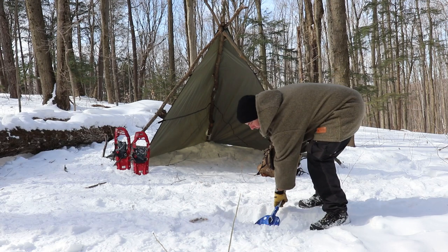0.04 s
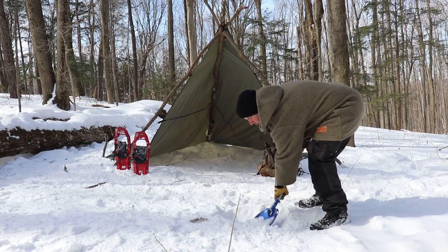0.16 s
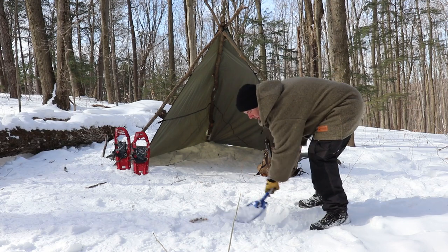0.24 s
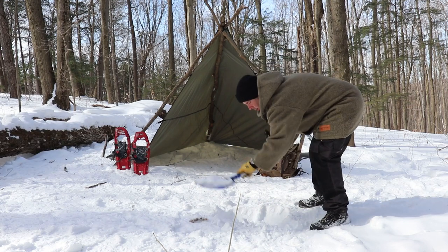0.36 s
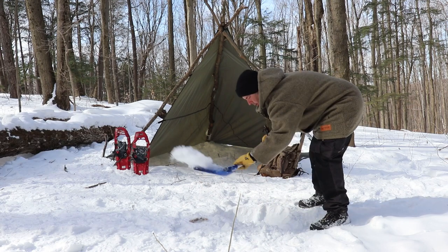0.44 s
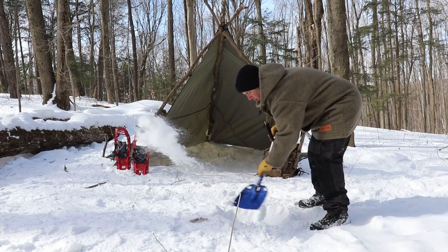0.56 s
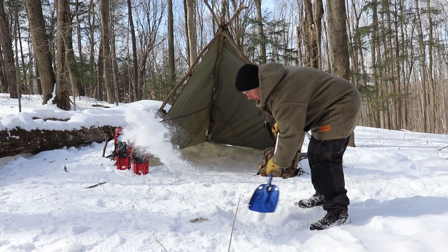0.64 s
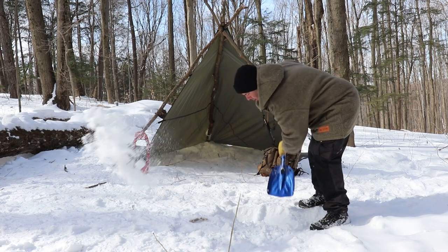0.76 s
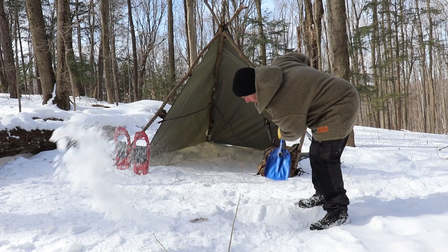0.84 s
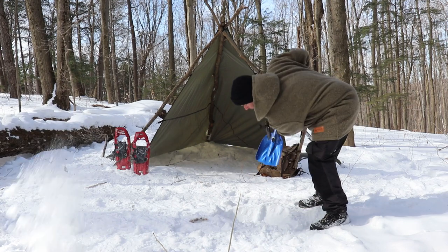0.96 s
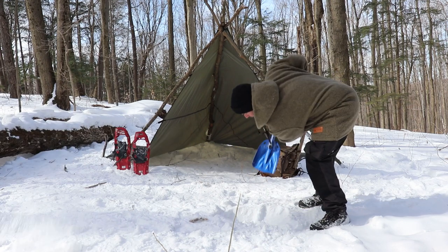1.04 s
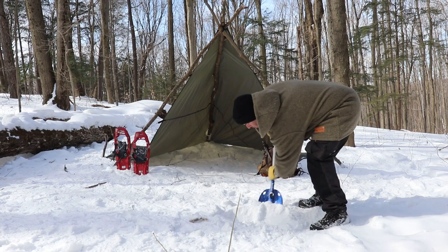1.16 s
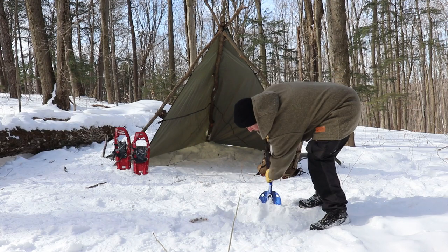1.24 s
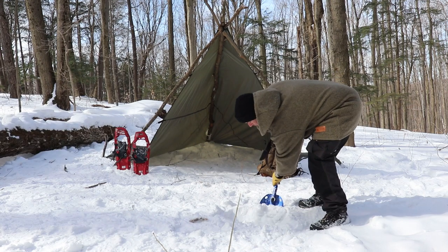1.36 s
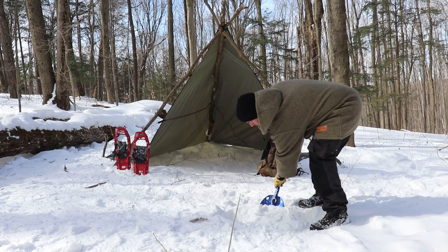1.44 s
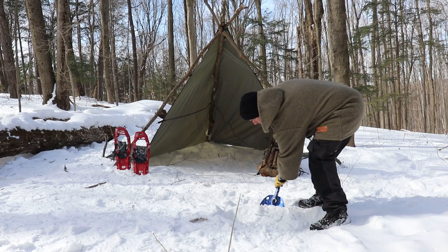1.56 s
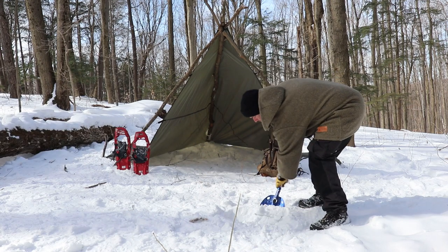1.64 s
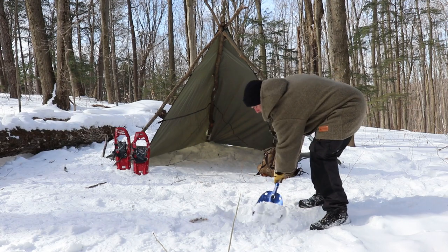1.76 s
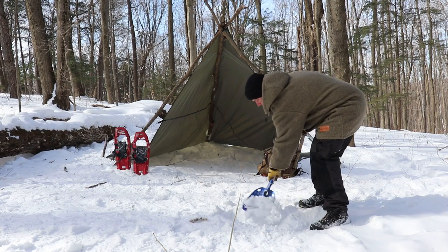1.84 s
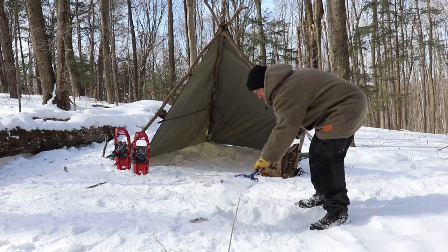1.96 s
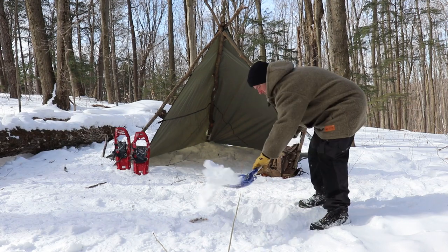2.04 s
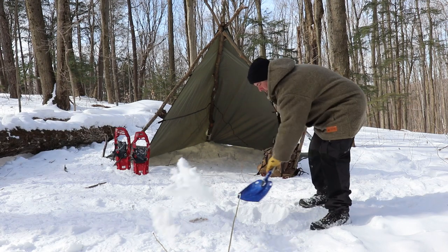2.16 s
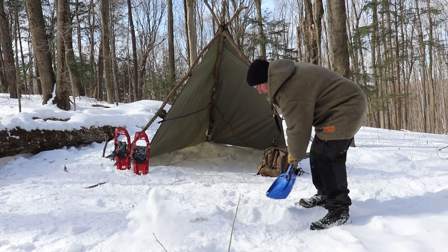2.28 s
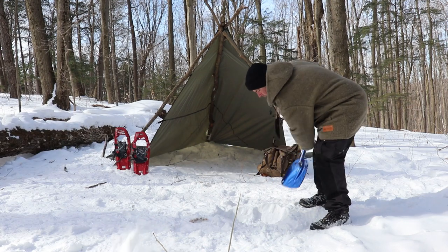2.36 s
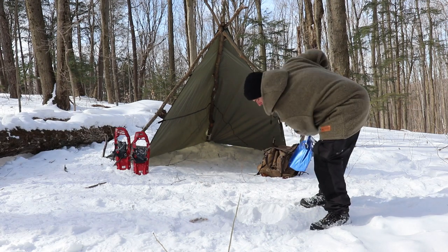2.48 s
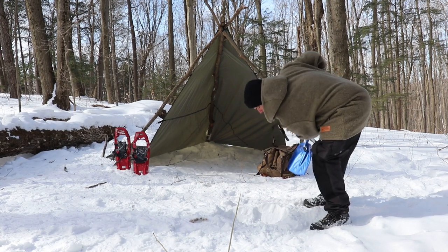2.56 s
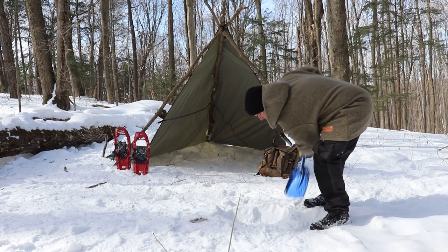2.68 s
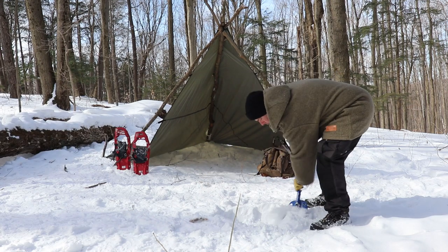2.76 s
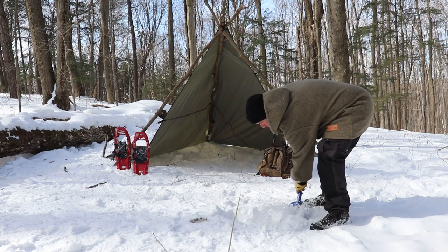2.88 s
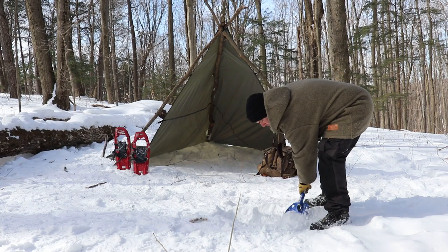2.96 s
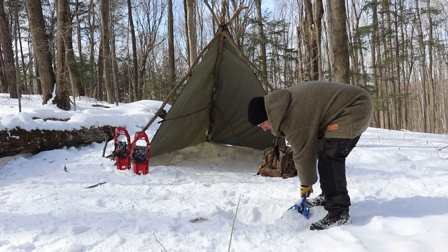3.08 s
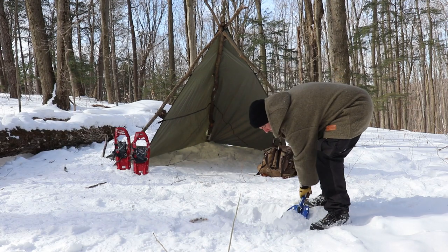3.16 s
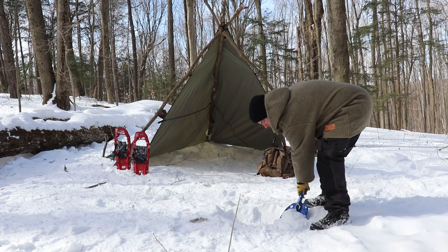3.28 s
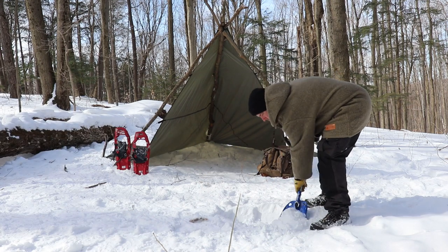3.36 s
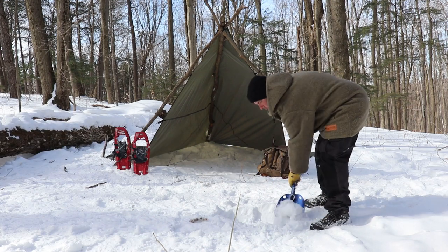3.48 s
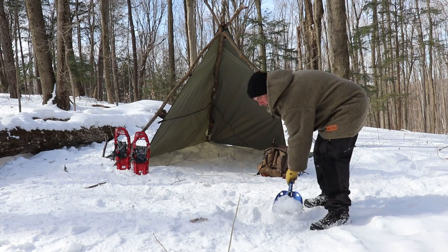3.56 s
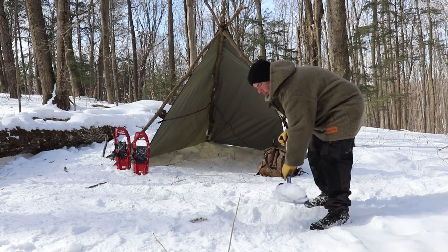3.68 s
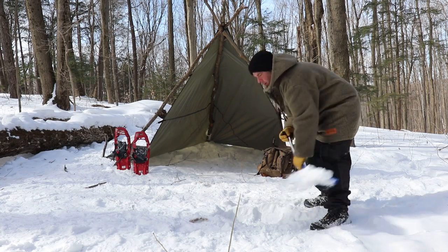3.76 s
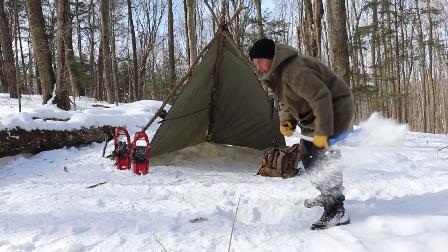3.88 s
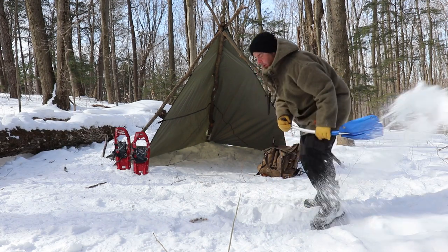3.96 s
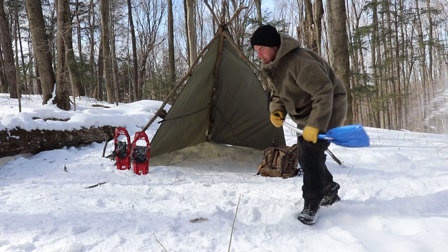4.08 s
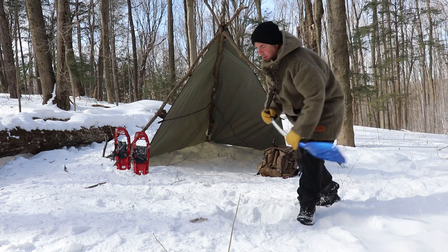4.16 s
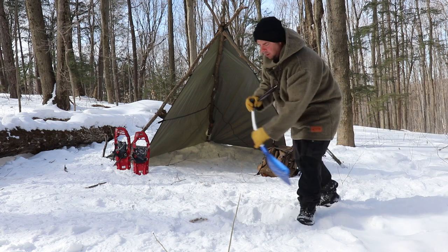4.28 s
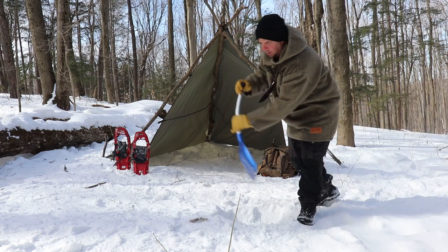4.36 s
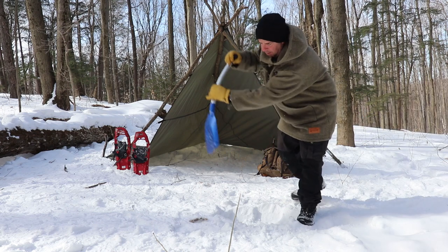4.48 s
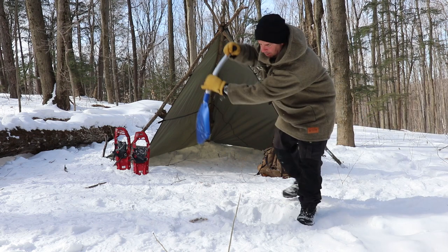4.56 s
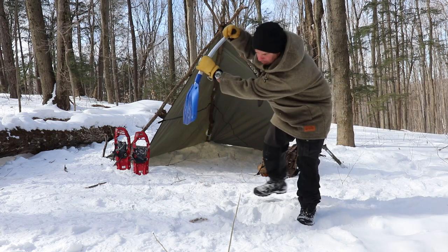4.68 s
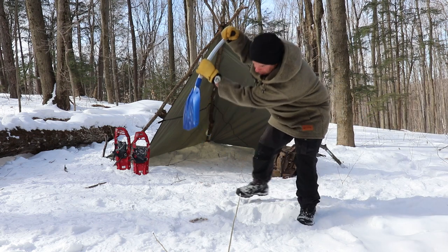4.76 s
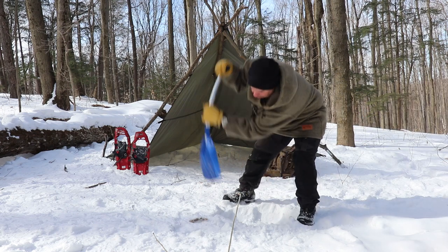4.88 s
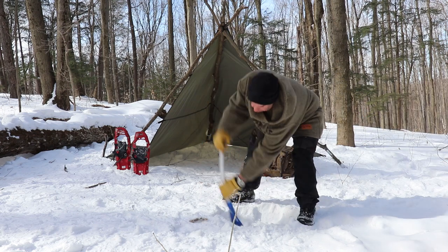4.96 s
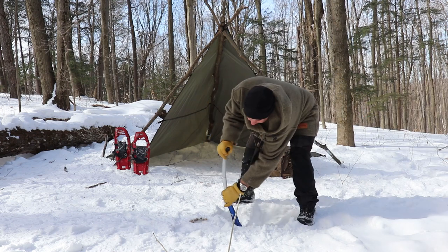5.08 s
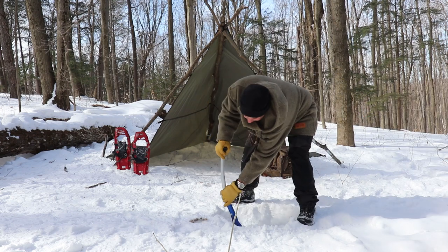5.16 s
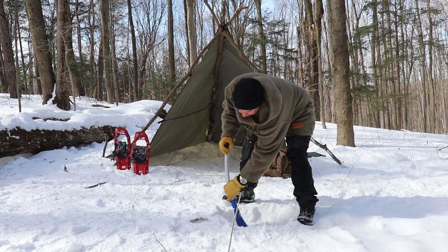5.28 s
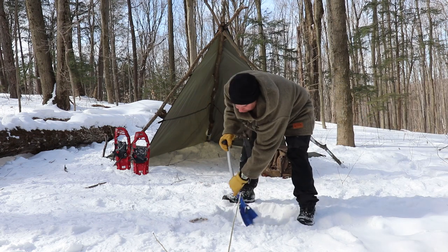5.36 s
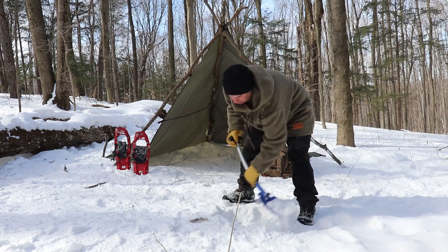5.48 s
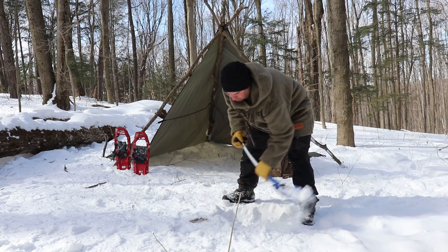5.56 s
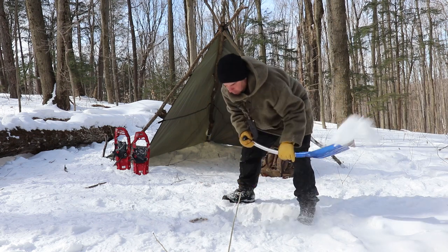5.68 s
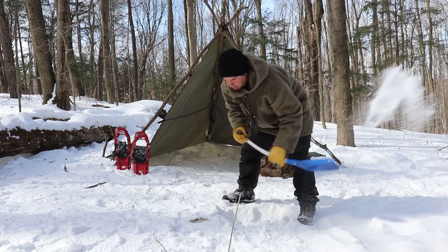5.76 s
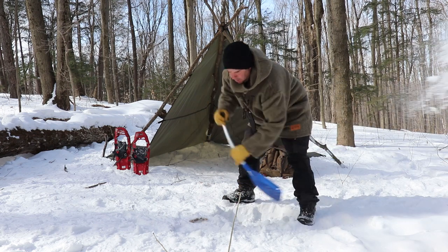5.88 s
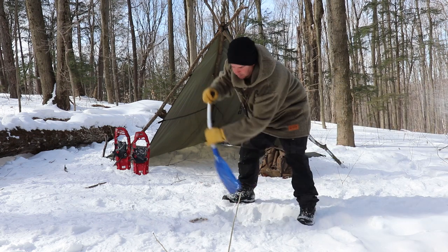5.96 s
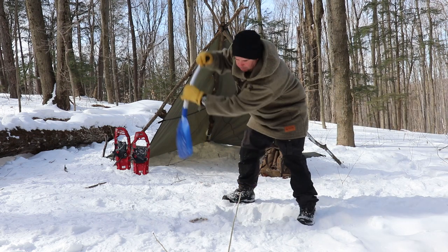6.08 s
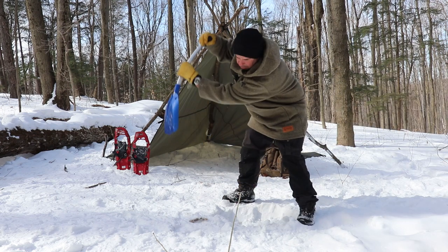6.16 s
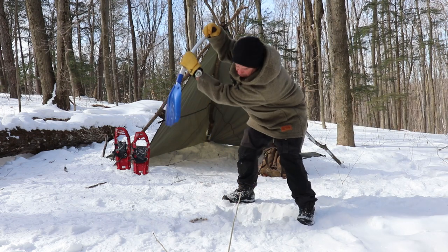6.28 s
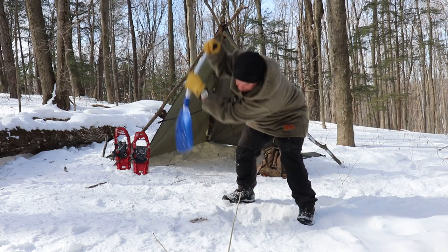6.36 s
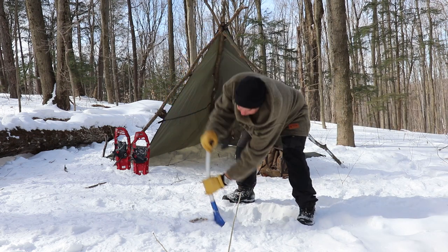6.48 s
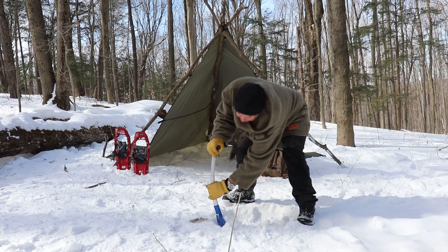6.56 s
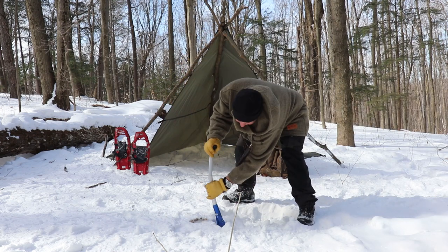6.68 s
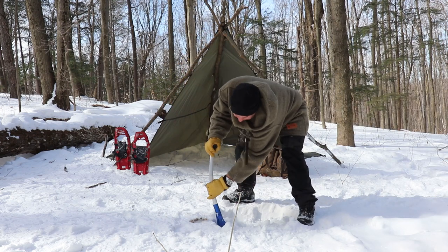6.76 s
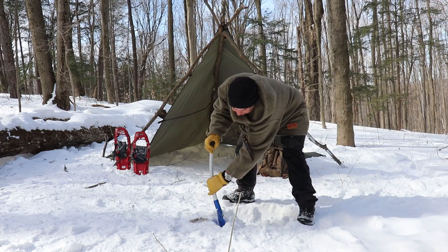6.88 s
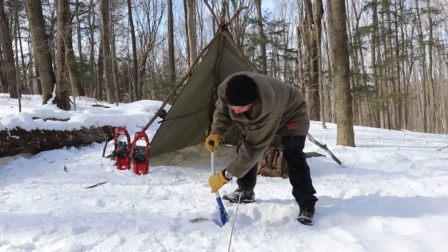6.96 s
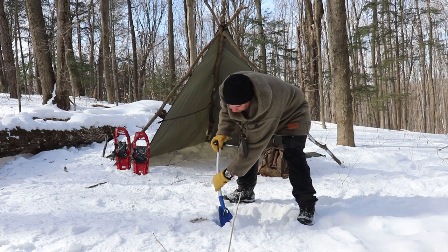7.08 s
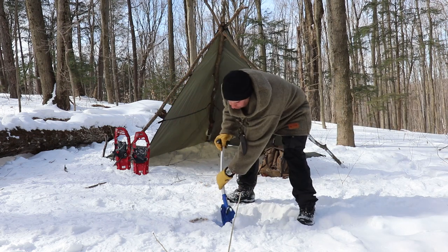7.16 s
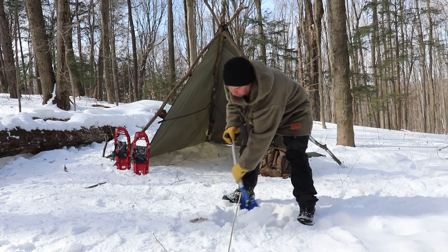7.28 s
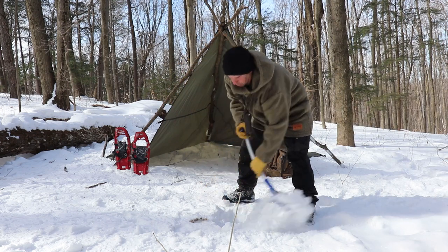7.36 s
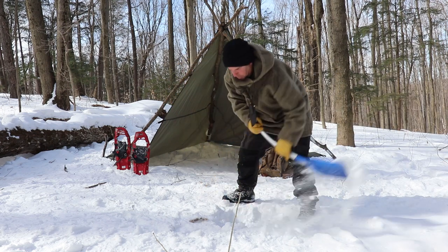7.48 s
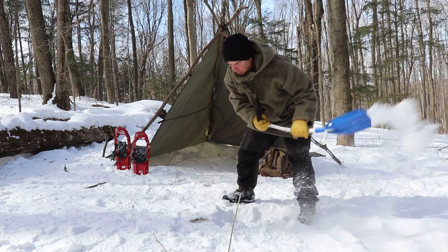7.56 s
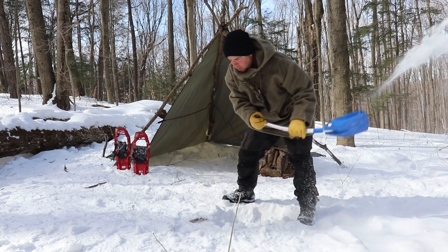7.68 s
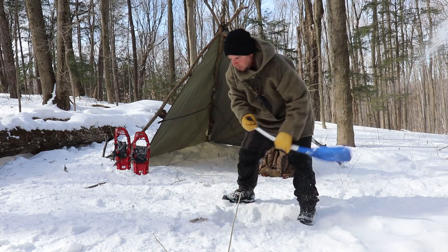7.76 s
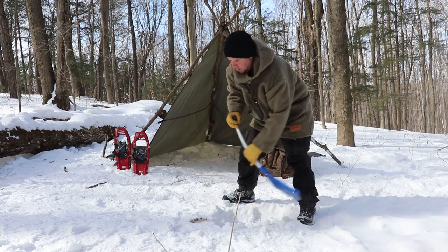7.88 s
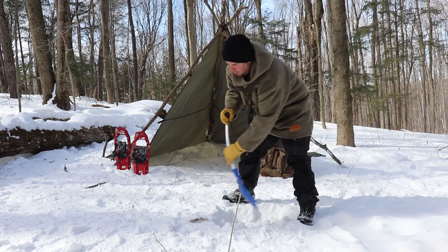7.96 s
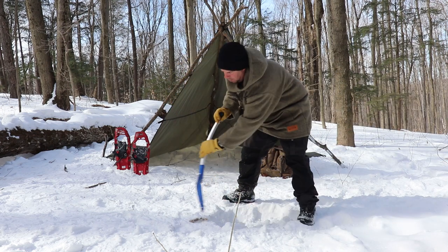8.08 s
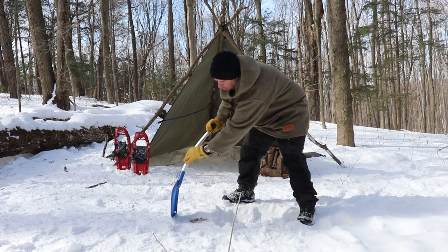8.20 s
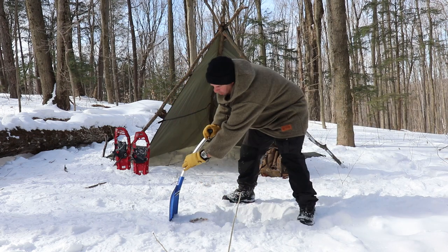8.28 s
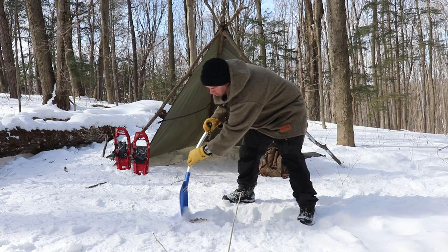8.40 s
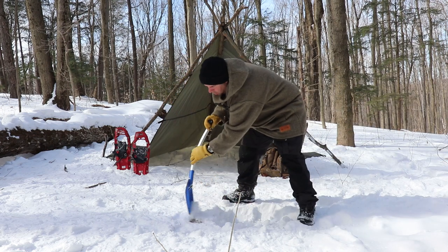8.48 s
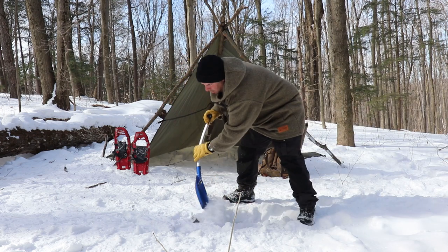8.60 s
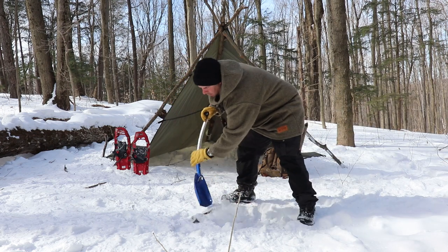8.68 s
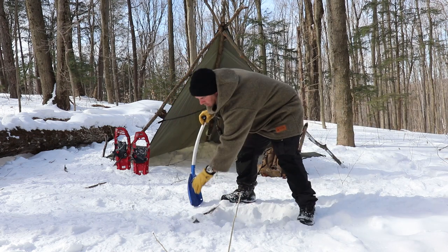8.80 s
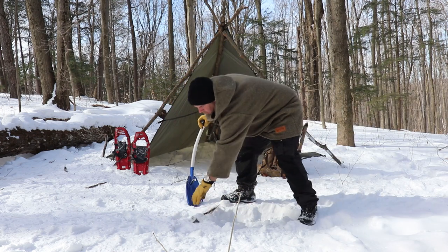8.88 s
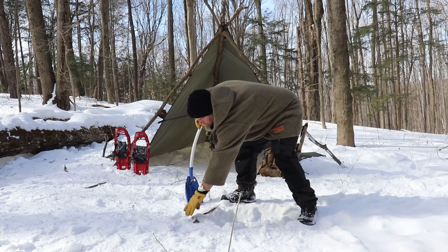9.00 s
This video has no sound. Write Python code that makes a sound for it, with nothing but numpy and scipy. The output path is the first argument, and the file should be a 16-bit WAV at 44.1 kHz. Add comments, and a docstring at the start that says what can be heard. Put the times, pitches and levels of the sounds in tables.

```python
"""A short metal shovel cuts packed snow in a still winter wood, a few metres away.
Four hard chops crush the crust; between them the blade is pushed and levered, slabs snap loose,
snow slides off the ringing blade, boots tread, a jacket rubs and a zip pull ticks.
Random bursts of snapping bonds are coloured as snow or cloth and shaped by strokes; blade, pack and
zip ring as decaying sines. Slabs crack as noise bursts; a faint tail and filtered hush surround it all."""
import sys
import numpy as np
from scipy import signal
from scipy.fft import rfft, irfft
from scipy.io import wavfile
from scipy.ndimage import uniform_filter1d, map_coordinates

SR = 44100
rng = np.random.default_rng(int(sys.argv[2]) if len(sys.argv) > 2 else 0)


def wrap_up_sound(samples):
    """Save the sound to the file named by the first command line argument, as 16-bit audio."""
    columns = np.atleast_2d(samples).T
    # keep every value between -1 and 1, then stretch to whole-number steps
    tamed = np.clip(columns, -1, 1)
    steps = np.round(tamed * 32767).astype(np.int16)
    wavfile.write(sys.argv[1], SR, steps)


N = 398223
TIME = np.arange(N) / SR  # seconds
DEEP_HZ, THUD_HZ, FIZZ_HZ = 330, 1400, 6000  # borders between deep thud, upper thud, crunch and fizz

# Modes of the free, unloaded blade. Each row: pitch in Hz, relative level in dB, t60 in seconds.
FREE_BLADE = [(567, -10, .26), (769, -6, .18), (900, -6, .12), (1100, -8, .2), (1234, -3, .22),
              (1367, -7, .17), (1524, 0, .2), (1626, -8, .22), (1812, -6, .11), (1985, -5, .12),
              (2245, 0, .27), (2385, -4, .18), (2474, -7, .24), (2712, -6, .13), (2925, -1, .11),
              (3146, -4, .1), (3290, -2, .09), (3612, -2, .13), (3740, -7, .09), (4120, -7, .09),
              (4555, -6, .12), (4895, -8, .13), (5350, -10, .09)]
# Modes of the blade gripped by snow. Each row: pitch in Hz, relative level in dB, t60 in seconds.
BURIED_BLADE = [(532, 6, 0.058), (810, -5.5, 0.017), (1400, -7.5, 0.044), (2396, -0.5, 0.024),
                (2620, -11, 0.011), (2990, -9, 0.057), (3270, -6.5, 0.06), (4740, -9.5, 0.13),
                (4810, -9.5, 0.054)]
# Colour of packed snow breaking. Each row: frequency in Hz, relative level in dB.
PACKED_SNOW = [(25, -43.5), (50, -29), (95, -8), (250, 0.5), (480, -1), (780, 2.5), (1300, 1), (1700, -4.5),
               (3200, -1.5), (4000, -9), (5100, -10), (6400, -19.5), (10500, -17), (13500, -20),
               (16000, -28)]
# Colour of loose snow. Each row: frequency in Hz, relative level in dB.
LOOSE_SNOW = [(60, -17.5), (280, -12), (550, -1.5), (1200, 0), (3200, 0.5), (5000, -8), (6500, -18),
              (12000, -19.5), (16000, -30)]


def undb(db):
    """Decibels to gain."""
    return 10 ** (np.asarray(db) / 20)


def unit(x):
    """Scale to rms 1."""
    return x / np.sqrt(np.mean(x ** 2))


def to_peak(x, db):
    """Scale to a peak level in dB."""
    return undb(db) * x / np.abs(x).max()


def add(out, start, x):
    """Mix a sound in at a time in seconds."""
    i = max(int(start * SR), 0)
    out[i:i + len(x)] += x[:max(N - i, 0)]


def through(x, response):
    """Pass a sound through an impulse response."""
    return signal.oaconvolve(x, response)[:len(x)]


def response_of(spectrum):
    """Minimum-phase impulse response with the given (Hz, dB) colour, by folding its cepstrum."""
    size = 2048
    hz, db = np.transpose(spectrum)
    bins = np.maximum(np.arange(size // 2 + 1) * SR / size, 1)
    level_db = np.interp(np.log(bins), np.log(hz), db)
    cepstrum = irfft(np.log(undb(level_db)))
    cepstrum[1:size // 2] *= 2
    cepstrum[size // 2 + 1:] = 0
    return irfft(np.exp(rfft(cepstrum)))


def fade(t, t60):
    """Exponential decay, falling 60 dB in t60 seconds."""
    return np.exp(-np.log(1000) * t / max(t60, 1e-4))


def walk(rate):
    """Smooth random wander at rms 1, with about `rate` fresh levels a second."""
    k = max(int(SR / rate), 1)
    held = np.repeat(rng.standard_normal(N // k + 1), k)
    return unit(uniform_filter1d(held, k)[:N])


def ring(modes):
    """Half a second of decaying sines at random phases, from (Hz, dB, t60) modes."""
    t = TIME[:SR // 2]
    return sum(undb(db) * fade(t, t60) * np.sin(2 * np.pi * (hz * t + rng.random())) for hz, db, t60 in modes)


def registers(x):
    """Split into thud, crunch and fizz at rms 1; the thud comes in a deep and an upper part."""
    cuts = [(DEEP_HZ, "low"), ([DEEP_HZ, THUD_HZ], "band"), ([THUD_HZ, FIZZ_HZ], "band"), (FIZZ_HZ, "high")]
    filters = [signal.butter(3, hz, kind, fs=SR, output="sos") for hz, kind in cuts]
    deep, upper, crunch, fizz = (signal.sosfiltfilt(sos, x) for sos in filters)
    thud_rms = np.std(deep + upper)
    return deep / thud_rms, upper / thud_rms, unit(crunch), unit(fizz)


def bite(parts, thud_db, fizz_db, depth=0.18):
    """Weigh the registers; the bigger the slab that moves, the deeper its thud reaches."""
    deep, upper, crunch, fizz = parts
    deep_gain = undb(depth * np.clip(thud_db, -12, 4))
    return undb(thud_db) * (upper + deep_gain * deep) + crunch + undb(fizz_db) * fizz


def fractures(rate, spread_db, burst_t60, bond_db):
    """Snow fails in little avalanches: each break of the crust sets off a brief burst of snapping ice bonds."""
    sizes = undb(spread_db * np.minimum(rng.exponential(size=N), 4))
    breaks = (rng.random(N) < rate / SR) * sizes  # `rate` breaks a second on average
    activity = np.abs(through(breaks ** 2, fade(TIME[:SR // 20], burst_t60) ** 2))
    bonds = rng.standard_normal(N) * undb(bond_db * np.minimum(rng.exponential(size=N), 4))
    x = np.sqrt(activity) * bonds
    # the work done over 25 ms is set by the push, however it is shared among the breaks
    return x / np.sqrt(np.abs(uniform_filter1d(x ** 2, size=1100)) + 1e-9)


def patchy(x, depth_db, patches):
    """Every piece that breaks off has its own size, so the colour jumps about from moment to moment."""
    size = 512
    hz, _, spectrum = signal.stft(x, SR, nperseg=size)
    place = np.log1p(hz / 700) / np.log1p(hz[-1] / 700) * patches
    moment = np.arange(spectrum.shape[1]) / 3.5
    # random levels on a grid of moments and pitches, joined smoothly
    field = rng.standard_normal((int(patches) + 2, int(moment[-1]) + 2))
    grid = np.meshgrid(place, moment, indexing="ij")
    db = depth_db * map_coordinates(field, grid, order=1)
    return signal.istft(spectrum * undb(db), SR, nperseg=size)[1][:N]


def on_blade(x, spectrum, modes, ring_db, drift):
    """Breaking snow is heard directly and through the metal, whose modes wander as the load on it shifts."""
    x = patchy(x, depth_db=3.2, patches=30)
    # the metal rings on a clock that runs a little fast or slow, which shifts all its pitches together
    clock = np.arange(N)
    warp = clock + np.cumsum(drift * unit(np.gradient(walk(16))))
    struck = np.interp(clock, np.maximum.accumulate(warp), x)
    metal = np.interp(warp, clock, through(struck, ring(modes)))
    direct = unit(through(x, response_of(spectrum)))
    return direct + undb(ring_db) * unit(metal)


def play(x, strokes, attack_s, release_s, deepen_db=0, judder_db=0, settle_db=-20, settle_s=.25):
    """Each stroke bites, swells or eases while it is held, lets go and settles (times span 60 dB).
    The thud grows by deepen_db as the stroke sinks in; the force judders as the contact sticks and slips."""
    power, thud, fizz = np.full(N, 1e-14), np.zeros(N), np.zeros(N)
    for start, hold, db, swell_db, thud_db, fizz_db in strokes:
        on = slice(*np.searchsorted(TIME, [start - attack_s, start + hold + release_s + settle_s]))
        t = TIME[on] - start
        depth = np.clip(t / max(hold, 1e-3), 0, 1)
        before, after = np.maximum(-t, 0), np.maximum(t - hold, 0)
        letting_go = np.maximum(fade(after, release_s), undb(settle_db) * fade(after, settle_s))
        force = undb(db + swell_db * depth) * fade(before, attack_s) * letting_go
        power[on] += force ** 2
        thud[on] += force ** 2 * (thud_db + deepen_db * (depth - .5))
        fizz[on] += force ** 2 * fizz_db
    judder = undb(judder_db * walk(110))
    # where strokes overlap, their balances of registers blend, each weighted by its power
    return np.sqrt(power) * judder * bite(registers(x), thud / power, fizz / power)


def air():
    """The hush of the wood, swaying a little: noise in a fixed colour."""
    # Colour of the hush. Each row: frequency in Hz, relative level in dB.
    hush = [(12, -26), (20, -1.5), (38, -12.5), (70, -7), (83, -10.5), (110, -14.5), (328, -17), (459, -17),
            (558, -20.5), (1290, -18), (6010, -31.5), (13500, -35), (16000, -49.5)]
    sway_db = .3 * walk(3)
    return unit(through(rng.standard_normal(N), response_of(hush))) * undb(-58.5 + sway_db)


def snaps(crack_t60=0.0072, crumble_t60=0.061, crumble_db=-9, linger=0.18):
    """A slab lets go with one sharp crack and crumbles for a moment after; a heavy, thudding slab takes longer."""
    # Slabs of crust snapping loose. Each row: start in seconds, peak in dB,
    # thud and fizz relative to the crunch in dB.
    slabs = [(0.012, -20, 9, -10), (.024, -15.5, 3.5, -16), (0.136, -5, -1, -15), (.335, -18.5, 1, -16),
             (.376, -10, 3, -15), (0.412, -17, -3, -19), (0.801, -38.5, 2, -11), (1.266, -13.5, -2, -9),
             (1.430, -14, 0, -16), (1.546, -10, -3, -20), (1.558, -9, 4, -27), (1.588, -12.5, 5, -15),
             (1.653, -19, -3, -33), (1.664, -20, 7, -15), (1.677, -11.5, 0, -15), (1.688, -12.5, 3.5, -14),
             (1.741, -14, -2, -21), (1.79, -13, -3, -34), (1.904, -12.5, 5, -25), (1.976, -21.5, 3, -11),
             (2.860, 2, 5.5, -6), (2.987, -13.5, -8, -8), (3.011, -8, 14, -8), (3.036, -4, 2, -15),
             (3.048, -7.5, -3.5, -16), (3.059, -10, 4.5, -23), (3.071, -2, 9, -12), (3.103, -0.5, 0, -14),
             (3.184, -9, 3, -24), (3.246, -11.5, 9, -19), (3.286, -11, 8, -10.5), (3.347, -19.5, 8, -12),
             (3.903, -16, -3.5, -14), (4.304, -15, 0, -9), (4.342, -23.5, 4, -11), (4.178, -30, 10, -18),
             (4.655, -31, 10, -16), (5.006, -32, 2.5, -12), (5.474, -11, -6, -23), (5.133, -1, -1.5, -30),
             (5.511, -9, -4.5, -21), (5.55, -10.5, 1, -9), (6.416, -27, -1.5, -3.5),
             (6.688, -20.5, 15, -10), (6.751, -20, -5, -9), (6.782, -17, -5.5, -12), (6.891, -22.5, 1, -20),
             (6.905, -15.5, -5, -10), (6.927, -9, -3, -13), (7.29, -12, -6, -20), (7.437, -13.5, -2.5, -12),
             (7.577, -10, -20, -19), (7.613, -11.5, -4, -5), (8.278, -37.5, -1, -10.5),
             (8.387, -19, -17, -12), (8.401, -14, -7, -16), (8.476, -20.5, -9, -23), (8.567, -8, -7, -15),
             (8.611, -19, -13, -17), (8.704, -20, -12, -4), (8.983, -12.5, -4, -21)]
    out, t, snow = np.zeros(N), TIME[:SR // 8], response_of(PACKED_SNOW)
    lead = SR // 100  # silence ahead, room for the two-way filters
    for start, db, thud_db, fizz_db in slabs:
        bulk = undb(linger * thud_db)
        envelope = fade(t, crack_t60 * bulk) + undb(crumble_db) * fade(t, crumble_t60 * bulk)
        burst = rng.standard_normal(len(t)) * envelope
        coloured = through(np.pad(burst, (lead, 0)), snow)
        x = bite(registers(coloured), thud_db, fizz_db, depth=0.23)
        add(out, start - lead / SR, to_peak(x, db))
    return out


def clods(rate, low_hz, octaves, cycles, spread_db):
    """Lumps tear loose, each with a dull pop of its own pitch that fades 60 dB in so many cycles."""
    out, t = np.zeros(N), TIME[:SR // 25]
    for when, pitch, luck in rng.random((int(rate * N / SR), 3)):
        hz = low_hz * 2 ** (octaves * pitch)
        size = undb(spread_db * min(-np.log(1 - luck), 3))
        envelope = np.minimum(t * hz, 1) * fade(t, cycles / hz)
        add(out, when * N / SR, size * envelope * np.sin(2 * np.pi * hz * t))
    return unit(out)


def pushes():
    """A slow blade breaks the crust bit by bit and pries clods out of it."""
    # The blade pushed or levered through the snow. Each row: start in seconds, hold in seconds,
    # crunch in dB, swell over the hold in dB, thud and fizz relative to the crunch in dB.
    push_strokes = [(.064, 0.095, -27.5, 3, 3, -13), (.170, 0.03, -29, 1.5, -3, -15),
                    (0.258, 0.06, -41, -4, -2.5, -11.5), (0.38, 0.15, -38, -12.5, -4.5, -13),
                    (1.275, .018, -28.5, 9, -2.5, -11.5), (1.335, 0.096, -34.5, -5, 6.5, -20),
                    (1.433, 0.054, -34, 2.5, 4, -11.5), (1.518, 0.067, -29.5, -2.5, 7, -17.5),
                    (1.745, .135, -41, 8, 0.5, -17), (1.901, 0.014, -27.5, 0.5, -1.5, -14.5),
                    (1.976, 0.054, -36.5, 1, -5, -14.5), (2.048, 0.056, -47, 1, -6, -15),
                    (2.938, .050, -40, -2, 6.5, -19), (3.019, .110, -30, 4, 2.5, -10.5),
                    (3.135, .110, -30, -1, 1, -10), (3.395, 0.091, -46.5, -5, -3.5, -8),
                    (3.495, 0.073, -37.5, 7.5, -1, -8.5), (5.017, 0.045, -45, 1.5, -2.5, -16),
                    (5.158, 0.22, -37.5, -9.5, 1, -10), (5.387, .020, -34, -0.5, -0.5, -13.5),
                    (5.43, 0.017, -25, 2.5, -8, -17.5), (5.475, 0.051, -22, -2.5, -7.5, -14.5),
                    (6.659, 0.019, -27.5, -5, -5.5, -11.5), (6.705, 0.24, -45.5, -11.5, 0.5, -13.5),
                    (6.936, .110, -32, -16, -3, -13), (7.065, 0.073, -24.5, -10, -3, -12.5),
                    (7.189, 0.043, -39.5, 0, 0.5, -7.5), (7.28, 0.073, -33, -11.5, -2.5, -11),
                    (7.362, 0.031, -31.5, 4, -2.5, -10.5), (7.43, 0.12, -32.5, -7, -5, -10.5),
                    (8.394, 0.038, -29.5, -1.5, -13, -12), (8.475, .035, -35.5, 1, -7, -16),
                    (8.514, 0.071, -26.5, 1, -12.5, -12.5), (8.614, 0.068, -33.5, -10.5, -5.5, -14.5),
                    (8.704, 0.045, -34.5, -1.5, -9, -18), (8.766, 0.16, -49, 0, -8.5, -8.5),
                    (8.949, 0.051, -33, 5.5, -5, -12.5)]
    x = fractures(rate=800, spread_db=4, burst_t60=0.028, bond_db=2.5)
    lumps = clods(rate=150, low_hz=378, octaves=1.8, cycles=7.9, spread_db=5)
    crunch = on_blade(x, PACKED_SNOW, BURIED_BLADE, ring_db=-9.0, drift=0.066) + undb(-7.5) * lumps
    return play(crunch, push_strokes, attack_s=0.066, release_s=0.082, judder_db=1.17,
                settle_db=-19.5, settle_s=0.28)


def thumps(cycles=9):
    """The pack gives under a boot or the blade: a few soft, low swings."""
    # Weight shaking the snow pack. Each row: start in seconds, peak in dB, middle pitch in Hz.
    jolts = [(.110, -27, 190), (1.295, -26, 86), (1.434, -26, 109), (2.144, -37, 212), (2.192, -42, 223),
             (2.223, -42, 222), (2.876, -30, 101), (3.824, -41, 161), (4.067, -34.5, 153),
             (4.179, -40, 193), (4.286, -40, 198), (4.456, -38, 237), (5.006, -35, 257), (5.209, -22, 305),
             (6.637, -31.5, 78), (8.420, -36, 345), (8.508, -32, 342)]
    out, t = np.zeros(N), TIME[:SR // 3]
    for start, db, hz in jolts:
        modes = [(hz * ratio, mode_db, cycles / hz) for ratio, mode_db in [(.7, -7), (1, -0.5), (1.5, -4)]]
        x = ring(modes)[:len(t)] * np.minimum(t * hz, 1)
        add(out, start, to_peak(x, db))
    return out


def knocks(rattle_t60=0.029):
    """The blade jolts on its shaft; each jolt favours the modes near one pitch, and stuck snow rattles."""
    # The free blade knocking on its shaft. Each row: start in seconds, peak in dB, favoured pitch in Hz,
    # focus in dB per octave, rattle relative to the ring in dB.
    jolts = [(.376, -15, 1120, 25, 0.5), (.547, -22, 2710, 13, -9), (.583, -25, 3612, 22, -8),
             (.702, -26, 1400, 3, 0), (.726, -32, 1234, 30, -3), (1.906, -9.5, 3010, 37, -3.5),
             (2.103, -24, 795, 12, 1), (2.112, -29, 2474, 20, -2), (2.318, -21, 1500, 7, -3),
             (2.319, -22.5, 3100, 26, -1), (4.065, -27, 565, 10, -4.5), (4.221, -33, 1580, 21, -8),
             (4.890, -37, 700, 7, -3), (5.754, -12.5, 2410, 11, 2), (5.777, -12.5, 1600, 17, -0.5),
             (5.959, -30.5, 1420, 8, 1), (6.196, -34, 2980, 4, -2), (6.560, -27, 800, 3, 14),
             (6.640, -5, 1950, 16, 0), (7.750, -35.5, 740, 19, -7), (7.845, -33.5, 564, 11, 1.5),
             (7.894, -20.5, 1900, 5.5, -2.5), (7.910, -28, 1510, 49, -6.5), (7.911, -24, 908, 26, 1),
             (8.732, -16.5, 1480, 23, 2), (8.812, -37, 3612, 40, -14), (8.850, -21.5, 3650, 19, -10),
             (8.853, -27.5, 2230, 70, -14), (8.914, -21.5, 1500, 8, 3)]
    out, t, crumbs = np.zeros(N), TIME[:SR // 2], response_of(LOOSE_SNOW)
    for start, db, favoured_hz, focus_db, rattle_db in jolts:
        # the more snow clings to the blade, the sooner the ring dies
        freedom = np.interp(rattle_db, [-20, -7, -2], [1.3, 1.0, .55])
        modes = [(hz, mode_db - focus_db * abs(np.log2(hz / favoured_hz)), t60 * freedom)
                 for hz, mode_db, t60 in FREE_BLADE]
        metal = ring(modes)
        rattle = through(rng.standard_normal(len(t)) * fade(t, rattle_t60), crumbs)
        seating = np.minimum(t / .002, 1)  # 2 ms rise
        x = (unit(metal) + undb(rattle_db) * unit(rattle)) * seating
        add(out, start, to_peak(x, db))
    return out


def throws():
    """Crumbs skid along the free blade and set it ringing; their weight damps and detunes it."""
    # Loose snow sliding off the lifted blade. Each row: start in seconds, hold in seconds,
    # crunch in dB, swell over the hold in dB, thud and fizz relative to the crunch in dB.
    slides = [(0.547, 0.044, -35, -0.5, -5.5, -15), (.620, 0.12, -48.5, -6.5, -1, -11.5),
              (3.632, 0.17, -53, 1, 0, -9.5), (3.800, 0.11, -48.5, 15.5, -2.5, -13),
              (3.923, 0.14, -34, -9, -3, -10.5), (5.586, 0.147, -42.5, -0.5, -3, -10.5),
              (5.759, 0.021, -25.5, 1.5, -6.5, -14), (7.572, 0.14, -31.5, -4, -4.5, -6.5)]
    x = fractures(rate=1100, spread_db=3.0, burst_t60=0.024, bond_db=2.5)
    loaded = [(hz, db, t60 / 2) for hz, db, t60 in FREE_BLADE]
    skid = on_blade(x, LOOSE_SNOW, loaded, ring_db=-4, drift=.008)
    return play(skid, slides, attack_s=0.058, release_s=.12, judder_db=1.95, settle_db=-22, settle_s=.25)


def sleeves():
    """Fibres catching and slipping, too fine to tell apart."""
    # Sleeves rubbing the jacket. Each row: start in seconds, hold in seconds,
    # rub in dB, swell over the hold in dB, flap and hiss relative to the rub in dB.
    rubs = [(1.086, 0.14, -52.5, 6.5, 0.5, -2), (2.437, 0.16, -52.5, 8.5, -4.5, -4),
            (2.588, 0.17, -49, -5, -0.5, -7.5), (4.526, .450, -65.5, -6.5, 2.5, -9.5),
            (6.120, .420, -67.5, 0, 1.5, -5.5)]
    # Colour of the cloth. Each row: frequency in Hz, relative level in dB.
    cloth = [(60, -12), (140, 3.5), (600, -4.5), (3200, -3), (6000, -9), (13000, -15.5), (16000, -27.5)]
    x = fractures(rate=2700, spread_db=2.5, burst_t60=0.006, bond_db=-2)
    return play(through(x, response_of(cloth)), rubs, attack_s=.06, release_s=.07, judder_db=3.5)


def chops():
    """A fast blade crushes a great many grains at once."""
    # The blade driven down into the crust. Each row: start in seconds, hold in seconds,
    # crunch in dB, swell over the hold in dB, thud (halfway down) and fizz relative to the crunch in dB.
    chop_strokes = [(1.285, 0.037, -18, 6, -3, -13.5), (2.858, .036, -12.5, -4.5, -0.5, -7.5),
                    (5.093, 0.032, -6.5, -8, -8.5, -10.5), (6.629, .020, -5.5, -5, -7.5, -11.5)]
    x = fractures(rate=1600, spread_db=2.5, burst_t60=0.013, bond_db=1.5)
    crunch = on_blade(x, PACKED_SNOW, BURIED_BLADE, ring_db=-9.5, drift=0.014)
    return play(crunch, chop_strokes, attack_s=0.022, release_s=0.069, deepen_db=7, judder_db=1.0,
                settle_db=-28, settle_s=0.16)


def steps():
    """Sparse crackle under the boots."""
    # Boots treading and shifting. Each row: start in seconds, hold in seconds,
    # crunch in dB, swell over the hold in dB, thud and fizz relative to the crunch in dB.
    treads = [(2.168, 0.088, -57.5, -0.5, -0.5, -16), (2.258, .120, -51.5, 1, 1.5, -22),
              (4.221, 0.2, -49, -4, 1.5, -14), (4.446, 0.081, -54, -1.5, 1, -7),
              (4.661, 0.0063, -45, -4, 0, -14), (4.765, 0.063, -58.5, -5, 2.5, -7),
              (5.854, 0.17, -64, -2, 2, -11.5), (6.189, 0.015, -44, -2.5, -5.5, -8),
              (6.245, .220, -64.5, -1, 1.5, -4), (6.562, 0.044, -44.5, -2, -5.5, -19.5)]
    x = fractures(rate=160, spread_db=2.5, burst_t60=0.041, bond_db=2.5)
    crackle = through(patchy(x, depth_db=4.5, patches=19), response_of(PACKED_SNOW))
    return play(crackle, treads, attack_s=0.046, release_s=.08, judder_db=1.5, settle_db=-9.5, settle_s=.4)


def ticks(t60=.009):
    """A tiny piece of metal gives short rings, two close in pitch and a faint one an octave up."""
    # A zip pull ticking as the body swings. Each row: start in seconds, peak in dB, pitch in Hz.
    zip_pull = [(4.354, -34, 8750), (4.403, -42, 9400), (4.425, -40, 8300), (6.169, -34.5, 10240),
                (6.187, -35, 8450), (6.266, -43, 9060), (6.424, -33, 12200), (6.480, -44, 10600)]
    out = np.zeros(N)
    for start, db, hz in zip_pull:
        x = ring([(hz, 0, t60), (hz * 0.95, -4, t60), (hz * 2.1, -9, t60 / 2)])
        add(out, start, to_peak(x, db))
    return out


def trunks(x, echo_db=-25, t60=0.5):
    """Tree trunks scatter back a faint, dull tail; the snow soaks up the rest."""
    t = TIME[:SR]
    scatter = rng.standard_normal(SR) * fade(t, t60) * np.minimum(t / 0.017, 1)  # 17 ms rise
    tail = through(scatter, response_of([(100, -1), (600, -9.0), (3000, -3.5), (8000, -5.5)]))
    return undb(echo_db) * through(x, tail / np.linalg.norm(tail))


def scene():
    """The digging, its echo and the still air."""
    blade = pushes() + knocks() + throws() + chops()
    work = blade + snaps() + thumps() + sleeves() + steps() + ticks()
    return (work + trunks(work) + air())[None]


def record(dry):
    """Peaks beyond full scale overload the recorder and clip; the top is cut above 16 kHz."""
    clipped = np.clip(dry, -1, 1)
    return signal.sosfilt(signal.ellip(10, .1, 70, 16000, fs=SR, output="sos"), clipped)


dry = scene()
out = record(dry)
wrap_up_sound(out)
```